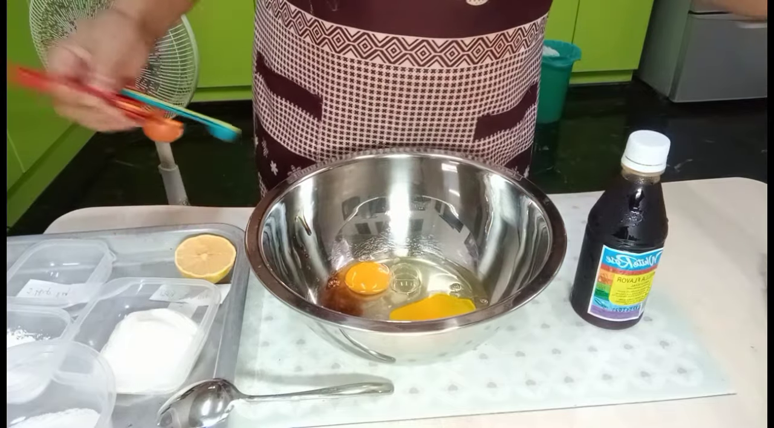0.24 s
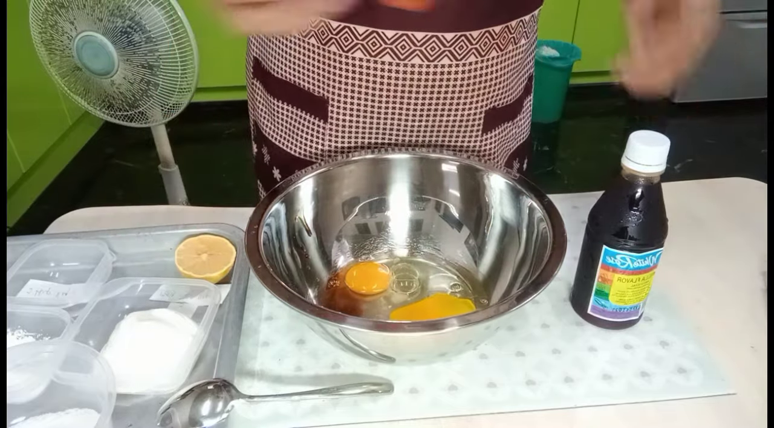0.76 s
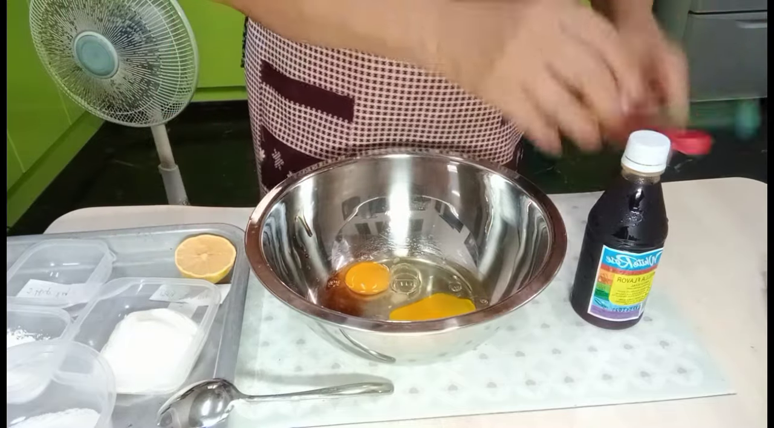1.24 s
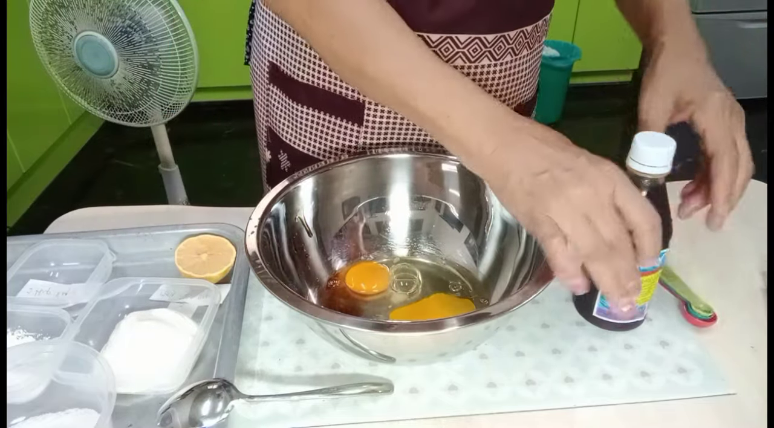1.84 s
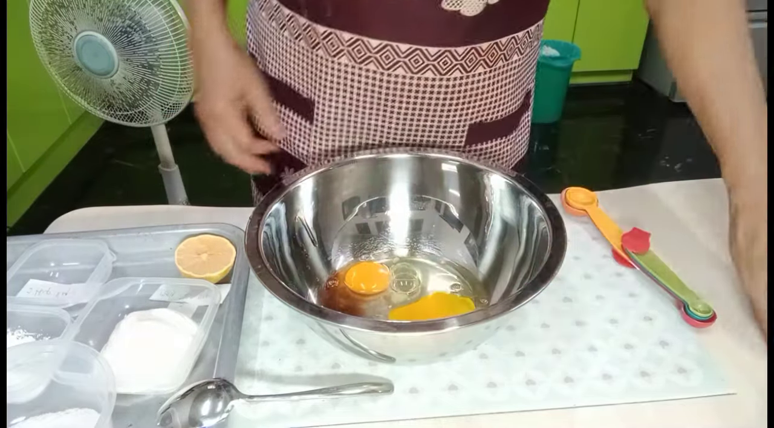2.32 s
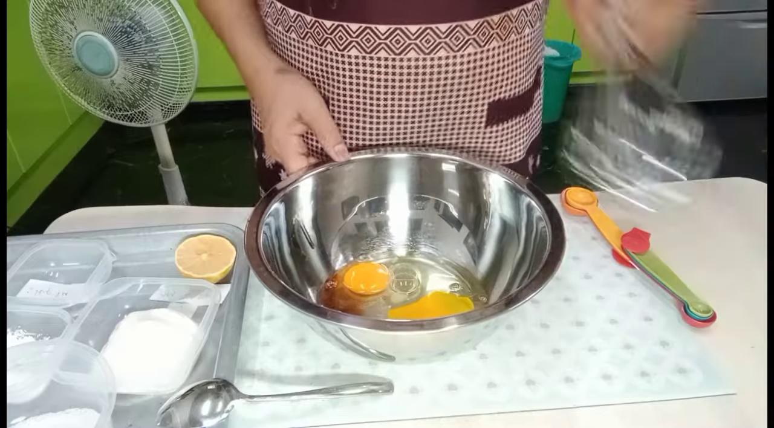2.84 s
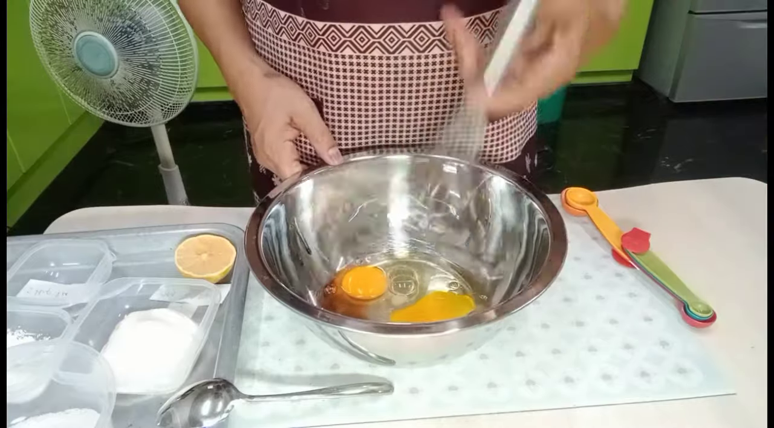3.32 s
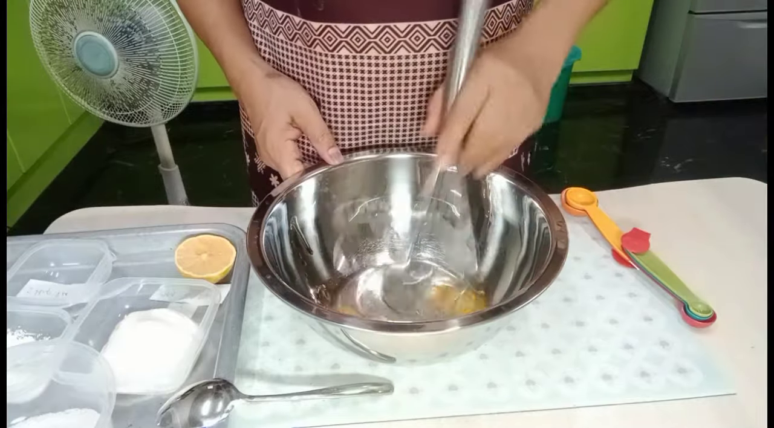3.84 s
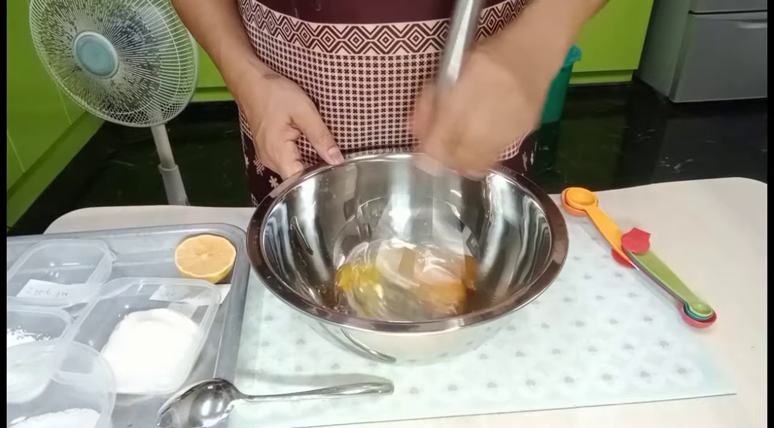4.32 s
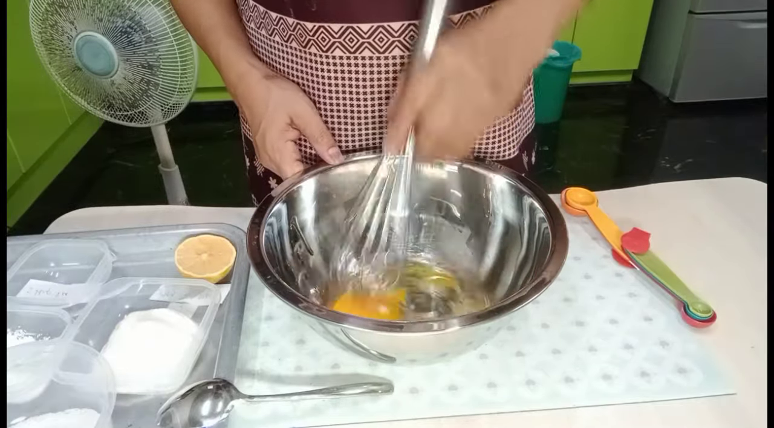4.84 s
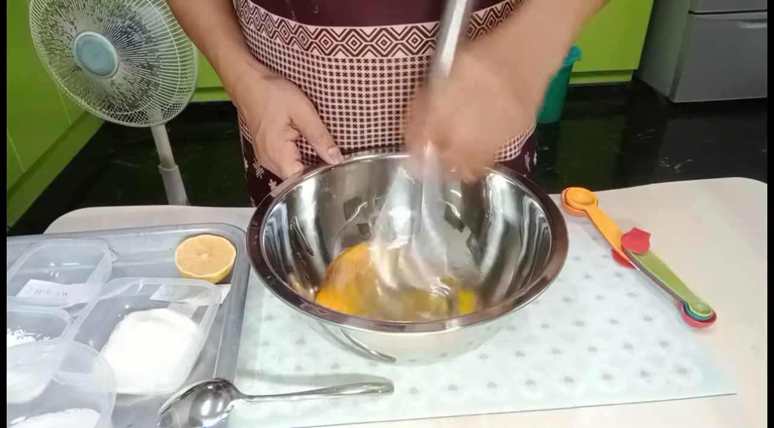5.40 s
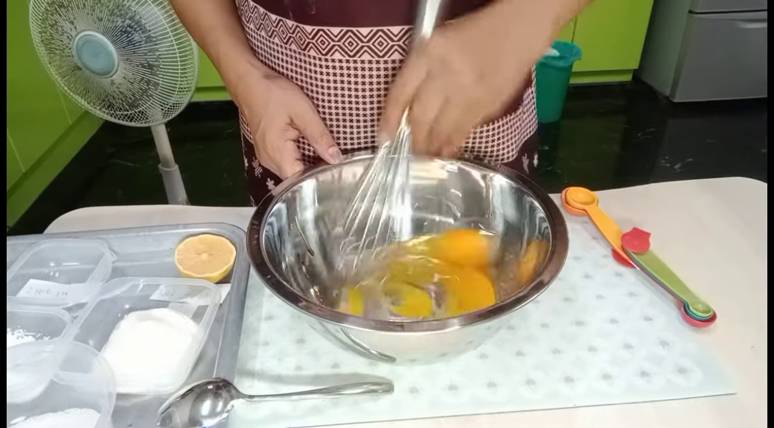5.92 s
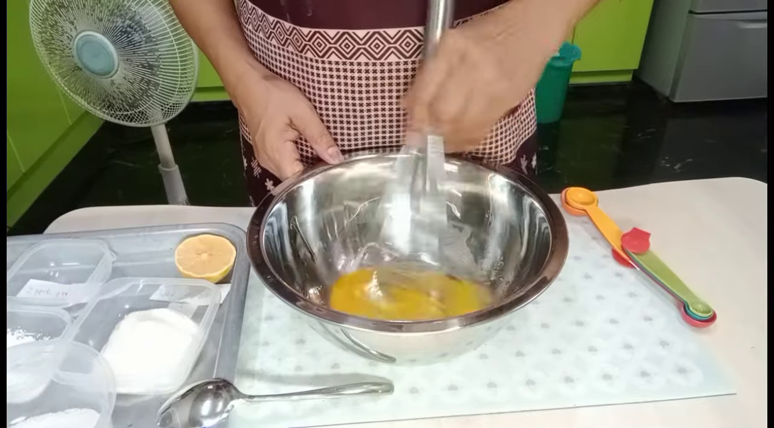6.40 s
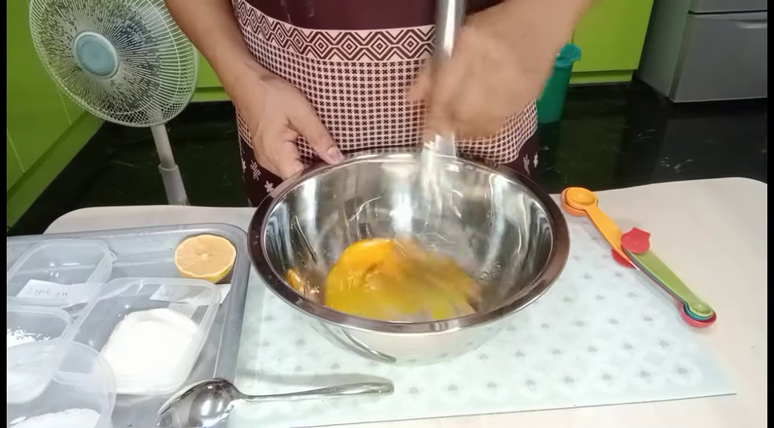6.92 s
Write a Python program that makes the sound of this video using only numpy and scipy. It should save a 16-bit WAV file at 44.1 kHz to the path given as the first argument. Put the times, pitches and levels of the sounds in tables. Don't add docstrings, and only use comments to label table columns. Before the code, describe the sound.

After light plastic clacks and a dull thud, a whisk strikes a steel bowl brightly, then clinks, scrapes and sloshes through egg in a hard kitchen.

```python
import sys
import numpy as np
from scipy import signal
from scipy.fft import rfft, irfft, next_fast_len
from scipy.io import wavfile
from scipy.ndimage import uniform_filter1d, map_coordinates

SR = 44100
rng = np.random.default_rng(int(sys.argv[2]) if len(sys.argv) > 2 else 0)


def boost_factor(decibels):
    exponent = np.asarray(decibels, float) / 20
    return 10 ** exponent


def transcribe(signal):
    frames = np.atleast_2d(signal).T
    limited = np.clip(frames, -1, 1)
    pcm = np.round(limited * 32767).astype(np.int16)
    wavfile.write(sys.argv[1], SR, pcm)


N = 315756
TAIL = 3 << 13
ROOMY = 1 << 15
BEFORE = 4096
LONG = next_fast_len(N + TAIL)

# start in seconds, peak level in dB, then thud, body and edge
# in dB against the peak.
RIM = [
    (3.2245, -8.5, -21.5, -12, -9),
    (3.2784, -19, -42, -11, -15.5),
    (3.357, -21, -14, 0, -3),
]
# start in seconds, peak level in dB, then thud, body and edge
# in dB against the peak.
CLINKS = [(3.546, -16, -21, -9.5, -15), (3.898, -30.5, -29, -33, -11), (3.934, -28, -32, -13, -13),
          (5.117, -30.5, -13, -2, -0.5), (5.3118, -30.5, -19, -7, 0), (5.3455, -20, -7.5, -8.5, -5),
          (5.564, -31, -15, -5, -1), (5.6565, -34.5, -32, -9, -12), (5.8007, -12.5, -15.5, -14, -14.5),
          (5.9295, -25, -6, -7, 1.5), (6.7175, -12.5, -15, -15, -7.5), (6.852, -38, -39, -31, 11),
          (6.987, -47, -34, 7, 10)]
# start in seconds, peak level in dB, then body and edge
# in dB against the peak.
SWIPES = [(3.565, -1.5, -11.5, -19), (3.597, -42, -7, -39), (3.7456, -20.5, -0.5, -9.5),
          (4.0273, -27.5, -9, 0), (4.1627, -33, 1.5, -7), (4.2065, -25.5, -30, -19), (4.3452, -36, -4, -2),
          (4.4605, -28.5, -14, -11), (4.482, -26.5, -0.5, -4.5), (4.543, -31.5, -5, 1),
          (4.6831, -37, 9, -13), (4.7407, -29.5, 4, -26), (4.9, -35.5, -43, 11), (5.0139, -31, -6, 2),
          (5.262, -35, -5, 7), (5.4344, -44, -13, -28), (5.792, -7.5, -15, -6.5), (6.19, -26.5, 11, -8),
          (6.4109, -24.5, -6, -9), (6.47, -30.5, 8, 3), (6.665, -24, -13, 0), (6.755, -12.5, -8, -11),
          (6.9015, -25, 3, 2), (7.0244, -47, -10, 9)]
BOWL_HZ = [265, 345, 615, 788, 899, 1067, 1125, 1270, 1357, 1513, 1873, 2120, 2640, 3400, 3550, 3760, 3900,
           5782, 5932, 6541, 6713, 6891, 7063, 7214, 7542, 9044, 9604, 9970]
# level in dB, T60 in seconds.
BOWL = [(-3.5, 0.1), (11, 0.14), (12, 0.075), (11, 0.11), (-2.5, 0.66), (-26, 0.48), (3.5, 0.28),
        (16, 0.085), (-17, 0.15), (4.5, 0.12), (-3, 0.6), (5, 0.21), (-21, 0.32), (2, 0.049), (9, 0.07),
        (1, 0.07), (12, 0.027), (-7, 0.027), (11, 0.12), (7, 0.2), (9, 0.2), (11, 0.2), (9, 0.2), (5, 0.2),
        (-24, 1), (-4, 0.53), (-27, 0.27), (-16, 0.21)]


def unit(x):
    return x / np.sqrt(np.mean(x ** 2, axis=-1, keepdims=True) + 1e-20)


def along(points, hz):
    f, v = np.transpose(points)
    return np.interp(np.log(hz + 1), np.log(f + 1), v)


def curves(rows):
    s, *cols = np.transpose(rows)
    return [np.interp(np.arange(N) / SR, s, c) for c in cols]


def wobble(rate):
    knots = rng.standard_normal(int(N * rate / SR) + 4)
    return map_coordinates(knots, [np.arange(N) * rate / SR])


def causal(db):
    cepstrum = irfft(np.log(boost_factor(db) + 1e-6))
    half = cepstrum.shape[-1] // 2
    cepstrum[..., 1:half] *= 2
    cepstrum[..., half + 1:] = 0
    return np.exp(rfft(cepstrum))


def noise(spectrum, spiky_db=0):
    strength_db = spiky_db * np.minimum(rng.exponential(size=LONG), 5)
    hail = rng.standard_normal(LONG) * boost_factor(strength_db)
    gain = boost_factor(along(spectrum, np.fft.rfftfreq(LONG, 1 / SR)))
    return irfft(rfft(unit(hail)) * gain)[:N]


def patchy(x, depth_db):
    z = signal.stft(x, nperseg=512)[2]
    field = uniform_filter1d(rng.standard_normal(z.shape), size=4, axis=0)
    field = uniform_filter1d(field, size=7, axis=1)
    return signal.istft(z * boost_factor(depth_db * field / field.std()), nperseg=512)[1][:N]


def tails(count):
    # frequency in Hz, T60 in seconds.
    decay = [(150, 0.32), (700, 0.54), (2000, 0.59), (7000, 0.6), (14000, 0.32)]
    hz, t, z = signal.stft(rng.standard_normal((count, TAIL)), SR, nperseg=256)
    fall = boost_factor(-60 * t / np.abs(along(decay, hz))[:, None])
    tail = signal.istft(z * fall, SR, nperseg=256)[1][:, :TAIL]
    tail *= np.clip(np.arange(TAIL) / SR / 0.0024, 0, 1) ** 2
    return unit(tail) / np.sqrt(TAIL)


def placed(times, sounds, wet_db):
    answers = rfft(tails(count=12), ROOMY)
    answers = answers[np.arange(len(times)) % len(answers)]
    heard = irfft(rfft(sounds, ROOMY) * (1 + boost_factor(wet_db) * answers))
    out = np.zeros(BEFORE + N + ROOMY)
    for s, sound in zip(times, heard):
        out[BEFORE + round(s * SR):][:ROOMY] += sound
    return out[BEFORE:][:N]


def rings(count, scatter_db, hz=BOWL_HZ, levels=BOWL, blur=.12):
    db, t60 = np.transpose(levels)[:, :, None]
    hz = np.c_[hz]
    t = np.arange(TAIL) / SR
    wander = np.cumsum(rng.standard_normal((len(hz), TAIL)), axis=1)
    phase = 2 * np.pi * hz * t + blur * (hz / 7000) ** 2 * wander
    modes = boost_factor(db - 60 * t / np.abs(t60)) * np.sin(phase)
    spots = boost_factor(scatter_db * rng.standard_normal((count, len(hz))))
    return unit(spots @ modes) / np.sqrt(TAIL)


def chatter(count, shape, grain_db):
    z = rfft(rng.standard_normal((count, TAIL)) * shape)
    contacts = boost_factor(grain_db * rng.standard_normal((count, TAIL // 64)))
    even = irfft(z / np.sqrt(np.abs(z) + 1e-9)) * np.sqrt(shape) * np.repeat(contacts, 64, axis=1)
    return unit(even) * np.sqrt(np.mean(shape ** 2))


def struck(rows, material, rise, t60, lumpy_db, ring=None, grain_db=0):
    # frequency in Hz,
    # lift in dB per Hz above the event's own level.
    bands = [(90, 19.5), (300, 23), (1150, 11), (3300, 8.5), (7500, 7), (14000, 24)]
    t, hz = np.arange(TAIL) / SR, np.fft.rfftfreq(TAIL, 1 / SR)
    onset = (1 - np.exp(-t / rise)) ** 2
    shape = boost_factor(-60 * t / t60) * onset
    knots, lift = np.transpose(bands)
    colour = np.array([db + along(np.c_[knots, lift + [thud, thud, body, edge, 0, air]], hz)
                       for s, db, thud, body, edge, air in rows])
    lumps = uniform_filter1d(rng.standard_normal(colour.shape), size=120)
    lumps = unit(uniform_filter1d(lumps, size=120))
    lumps *= lumpy_db / (1 + (hz / 5000) ** 2)
    filtered = causal(colour + along(material, hz) + lumps)
    sound = rfft(chatter(len(rows), shape, grain_db)) * filtered
    if ring is not None:
        sound += rfft(ring * onset) * causal(colour)
    return irfft(sound)


def pockets(db, hz, t60, size):
    t = np.arange(size) / SR
    bend = 0.061 * rng.standard_normal(hz.shape)
    envelope = boost_factor(db - 60 * t / t60) * (1 - np.exp(-t / 0.0014)) ** 2
    return envelope * np.sin(2 * np.pi * hz * (t + bend * t * t / t60))


def fan():
    # time in seconds, level in dB.
    rotor = [(0, -45), (.55, -43), (.85, -53), (1.5, -42.5), (1.9, -56), (2.6, -57.5), (3.1, -51),
             (3.9, -46), (4.7, -58), (6.0, -59), (6.45, -49.5), (7.16, -72)]
    throbs = [-1, -6.5, 6.5, 1.5, -3, 1, 0.5, 1.5, 0, 1, -2, -1.5, -11, -3.5, -4, -2, 0, 3.5, -3, -2, 2.5,
              2.5, -0.5]
    # frequency in Hz, level in dB per Hz.
    air = [(25, 16), (60, 0.5), (95, 6), (118, 17), (140, 7.5), (180, 12.5), (212, -1.5), (232, 11),
           (252, -3), (298, -2), (320, 11), (345, 0), (430, -4), (560, 1.5), (620, 4), (700, -2.5),
           (1150, -3), (1260, 6), (1400, -6), (2700, -5), (16000, -10)]
    mains_hz, beat_hz, in_step_s, first_throb_s = 120.07, 3.2, .8, .175
    mains_db, side_db, swell_db = -55, -73, 5.5
    t = np.arange(N) / SR
    turn = 2 * np.pi * (t - in_step_s)

    def line(order):
        level = boost_factor(2 * wobble(10.0))
        return level * np.sin((mains_hz - order * beat_hz) * turn + .45 * wobble(2.0))

    hum = boost_factor(mains_db) * line(0) + boost_factor(curves(rotor)[0]) * line(1) + boost_factor(side_db) * line(2)
    gusts_db = -56.5 + 12.0 + .5 * wobble(1.5) + 0.18 * wobble(16)
    breeze = boost_factor(gusts_db) * patchy(noise(air), depth_db=1.6)
    throb_db = np.interp(t, first_throb_s + np.arange(len(throbs)) / beat_hz, throbs)
    swell = boost_factor(throb_db + 7.5 + swell_db * (np.cos(beat_hz * turn) - 2.1))
    return swell * hum + breeze


def spoons():
    # start in seconds, peak level in dB, then body, edge and air
    # in dB against the peak.
    clicks = [(-0.015, -34.5, 3, -9.5, -50), (0.017, -54, 6, 9, -38), (0.922, -27.5, -37, -19.5, -43),
              (0.951, -35, -20, -8.5, -8.5), (0.9798, -51, 0, -6, -26), (1.01, -53, -30, 9, -22),
              (1.08, -57.5, 11, -11, -29), (1.392, -18.5, -3.5, -11, -22.5), (1.4232, -58, -4, 4.5, -27),
              (1.4598, -42.5, -20, 11.5, -30), (1.508, -26, -7, -10, -15), (1.5921, -17, -9, -10.5, -13),
              (1.6, -18, -17, -15.5, -21), (2.479, -47.5, -12, -12, -45)]
    # start in seconds, peak level in dB, then thud, body and edge
    # in dB against the peak.
    bottle_rows = [
        (2.1135, -49.5, 8.5, 7.5, 12),
    ]
    # frequency in Hz, level in dB.
    plastic = [(800, -0.5), (1200, -4), (1800, 0.5), (3800, 4), (4700, 7.5), (5600, 3.5), (7000, -3),
               (9000, 2.5)]
    # frequency in Hz, level in dB.
    table_top = [(50, 0), (125, 6), (250, 4), (400, -10.5), (600, 9), (1000, 5), (2000, -10.5), (3500, -5)]
    thud_db, thud_grows, bottle_air_db = -51.5, 0.33, -28
    rows = [(s, db, thud_db + thud_grows * db - db, body, edge, air) for s, db, body, edge, air in clicks]
    rattle = boost_factor(11) * struck(rows, plastic, rise=.0006, t60=.016, lumpy_db=.6)
    bottle = boost_factor(5.5) * struck([(*bottle_rows[0], bottle_air_db)], table_top,
                               rise=0.00059, t60=0.056, lumpy_db=0.0)
    return placed([row[0] for row in clicks + bottle_rows], np.r_[rattle, bottle], wet_db=4.0)


def plops():
    # start in seconds, peak level in dB, pitch in Hz, T60 in seconds.
    bursts = [(3.356, -19, 1144, 0.063), (3.732, -39, 1273, 0.051), (3.768, -34.5, 1280, 0.019),
              (3.861, -24, 1556, 0.023), (3.955, -35.5, 1310, 0.034), (4.248, -40, 1495, 0.044),
              (4.329, -44.5, 830, 0.1), (4.839, -23.5, 1174, 0.02), (6.214, -28.5, 858, 0.071),
              (6.686, -34.5, 588, 0.045), (6.77, -30.5, 1278, 0.083)]
    pings = [(3.2311, -9.5, 3954, 0.024), (3.3614, -29, 3644, 0.039), (3.5844, -29.5, 3920, 0.032),
             (4.0544, -50, 3500, 0.041), (4.4857, -41.5, 3620, 0.024), (5.0294, -49, 3560, 0.046),
             (5.3453, -40, 3180, 0.011), (5.8067, -32, 3830, 0.033), (6.2003, -30.5, 3520, 0.017),
             (6.4894, -41.5, 3480, 0.03), (6.7201, -14.5, 3410, 0.017)]
    knocks = [(0.091, -57, 880, 0.51), (3.749, -39.5, 617, 0.2), (3.954, -44, 630, 0.06),
              (4.019, -47, 506, 0.081), (5.125, -27.5, 616, 0.026), (5.316, -33, 571, 0.045),
              (5.566, -34, 584, 0.068), (5.678, -42, 893, 0.064), (5.932, -40.5, 834, 0.21),
              (6.419, -39.5, 595, 0.056), (6.986, -49, 595, 0.16)]
    thuds = [(1.399, -45, 261, 0.15), (2.114, -43, 99.6, 0.061), (2.12, -30.5, 111, 0.12),
             (3.359, -27.5, 106, 0.079), (3.577, -36, 279.5, 0.16), (5.123, -43, 148, 0.068),
             (5.345, -28, 191.3, 0.11), (6.29, -42.5, 342, 0.062), (6.718, -24, 226, 0.066),
             (6.722, -29.5, 336, 0.11), (7.052, -42.5, 193, 0.14)]
    clacks = [
        (.923, -23, 5230, 0.013),
        (0.925, -39, 3240, .02),
        (.924, -40, 8700, .012),
        (.952, -46, 3370, 0.018),
        (.952, -42, 9500, .012),
        (1.392, -12, 7260, 0.021),
        (1.393, -23.5, 1260, 0.014),
        (1.462, -40, 3300, .02),
        (1.6, -32, 9250, .02),
    ]
    s, db, hz, t60 = np.transpose(bursts + pings + knocks + thuds + clacks)[:, :, None]
    return placed(s[:, 0], pockets(db + 9.5, hz, t60, size=TAIL // 2), wet_db=-7)


def froth(count=1500, size=1792):
    draw = rng.random((count, 1))
    hz = np.clip(1300 * np.exp(.65 * rng.standard_normal((count, 1))), 400, 4200)
    size_db = np.minimum(3.5 * rng.exponential(size=(count, 1)), 6)
    grains = pockets(size_db, hz, 0.058 + 25 / hz, size=size)
    where = (draw * N).astype(int) + np.arange(size)
    return unit(np.bincount(where.ravel(), grains.ravel(), N + size)[:N])


def wake():
    grows, rise_s, t60_s = 0.96, 0.024, 0.65
    s, db = np.transpose([row[:2] for row in RIM + CLINKS + SWIPES])[:, :, None]
    since = np.maximum(np.arange(0, N, 64) / SR - s, 0)
    shake = boost_factor(grows * db - 60 * since / t60_s) * (1 - np.exp(-since / rise_s))
    return np.repeat(shake.sum(axis=0), 64)[:N]


def stirring():
    # time in seconds, effort in dB.
    drag_effort = [(3.3, -31), (3.6, -58), (3.87, -48), (4.01, -47), (4.3, -45.5), (4.89, -48.5),
                   (5.3, -45), (5.42, -44), (5.6, -44.5), (5.85, -44), (6.21, -45.5), (6.52, -43),
                   (6.7, -45), (6.9, -52), (7.0, -45), (7.05, -52), (7.16, -53)]
    starts_s = 3.5
    hiss_db, slosh_db = -12, -19
    hiss_wake_db, slosh_wake_db = -27.5, -38
    effort = boost_factor(curves(drag_effort)[0]) * (np.arange(N) / SR > starts_s)
    shake = wake()

    hiss = (boost_factor(hiss_db) * effort + boost_factor(hiss_wake_db) * shake) * boost_factor(9.0 + 3.5 * wobble(15))
    hiss *= noise([(1800, -38), (2600, -16.5), (4000, -6.0), (5800, -4.5), (7000, 0.5), (8200, -7.5),
                   (10000, -7.5), (15000, -8)], spiky_db=6.0)
    scrape = effort * boost_factor(2 + 4.5 * wobble(22))
    scrape *= noise([(600, -15), (850, -10.5), (1700, -5.0), (2400, -8.5), (4000, -85)], spiky_db=1.0)
    slosh = (boost_factor(slosh_db) * effort + boost_factor(slosh_wake_db) * shake) * boost_factor(13.5 + 3.5 * wobble(25))
    slosh *= noise([(50, -50), (110, -15), (200, 1.0), (350, 5.0), (600, -4.5), (900, -39), (1500, -43)])

    steel = signal.fftconvolve(hiss + scrape, rings(1, scatter_db=4)[0])[:N]
    near = hiss + scrape + slosh + boost_factor(-3.0) * steel + boost_factor(-6.5) * effort * froth()
    return near + boost_factor(-9.0) * signal.fftconvolve(near, tails(1)[0])[:N]


def singing():
    # start in seconds, peak level in dB, pitch in Hz, T60 in seconds. Modes left
    sings = [(3.226, -24, 1510, 0.45), (3.226, -26.5, 899, 0.77), (3.226, -32, 1858, .6),
             (3.227, -27, 2643, 0.39), (3.226, -28, 594, 0.17), (3.226, -36, 788, 0.6),
             (3.265, -31.5, 1356, 0.68), (3.357, -25, 621, 0.26), (3.357, -26.5, 786, 0.27),
             (3.357, -23, 882, .2), (3.357, -28, 1112, .6), (3.357, -28, 1508, 0.41),
             (3.357, -30.5, 2106, .4), (3.357, -23, 2610, 0.096), (3.357, -32, 3200, 0.27),
             (3.357, -32, 3700, 0.27), (3.55, -30.5, 349.4, 0.32), (3.549, -28.5, 918, 0.24),
             (3.572, -23.5, 1236, 0.23), (3.572, -21.5, 1648, 0.067), (3.572, -31, 592, .08),
             (3.587, -30, 2530, 0.12), (4.845, -43, 1150, .4), (5.135, -40, 1280, .15),
             (5.14, -41, 714, .3), (5.347, -32, 820, 0.22), (5.347, -35, 1253, .15), (5.375, -39, 2950, .2),
             (5.566, -41, 2290, .12), (5.57, -40, 1288, 0.18), (5.799, -31, 1217, 0.092),
             (5.81, -35.5, 2290, 0.42), (5.802, -35, 3811, .16), (5.81, -47, 600, 0.26),
             (5.84, -32, 826, 0.25), (5.85, -36, 1307, 0.17), (5.932, -40, 300, .15),
             (5.932, -37, 612, 0.14), (6.21, -34, 1240, 0.1), (6.72, -30, 1490, 0.41),
             (6.72, -26, 795, 0.13), (6.72, -35, 2990, 0.23), (6.772, -25, 830, 0.11),
             (6.99, -40.5, 1258, 0.37), (7.0, -42, 490, 0.51),
             (3.216, -40, 6800, .05), (3.226, -8, 5782, .07), (3.228, -13, 5932, .2),
              (3.226, -14, 6891, .2), (3.228, -12, 6713, .08), (3.575, -22, 6600, .08),
              (2.114, -48, 3500, .2), (2.1135, -30, 5300, .004), (6.72, -22, 6890, .25),
              (6.9029, -30, 10200, .02), (6.9508, -36, 9800, .02), (3.72, -40, 1240, .5),
              (3.358, -15, 1190, .1), (.925, -44, 7400, .2), (.025, -45, 1300, .2), (0, -46, 7000, .3)]
    snap = [
        (3.2778, 6, 6900, .003),
    ]
    # start in seconds, peak level in dB, pitch in Hz,
    # T60 in seconds, glide in Hz per second.
    glides = [
        (3.955, -44, 1420, 0.18, 7000),
        (4.082, -28, 1700, .06, 5000),
        (4.103, -33, 1694, 0.18, -9000),
        (4.149, -39, 1170, .08, 2000),
        (4.215, -44, 1520, .15, 500),
        (4.265, -42, 1180, 0.11, 3000),
        (4.34, -41, 1140, .12, -2000),
        (4.88, -45, 1074, .08, 2000),
        (4.93, -42, 1230, 0.11, -1000),
        (3.41, -26, 1243, 0.18, -2500),
    ]
    steel_rise_s, glide_rise_s = 0.00036, 0.0031
    t = np.arange(TAIL) / SR
    rows = [(*row, 0, steel_rise_s) for row in sings + snap]
    rows += [(*row, glide_rise_s) for row in glides]
    s, db, hz, t60, glide, rise = np.transpose(rows)[:, :, None]
    bent = glide * t60 / 4 * (t - t60 / 4 * (1 - np.exp(-4 * t / t60)))
    envelope = boost_factor(db - 60 * t / t60) * (1 - np.exp(-t / rise)) ** 2
    tones = envelope * np.sin(2 * np.pi * (hz * t + bent))
    return placed(s[:, 0], tones, wet_db=-10)


def clinks():
    free_hz = [616, 899, 1067, 1125, 1230, 1357, 1513, 1873, 2120, 2643, 3290, 3760, 3900, 5782, 5932, 6545,
               6713, 6890, 7219, 7540, 8436, 9044, 9606, 9970]
    # level in dB, T60 in seconds.
    free_levels = [(-8, 0.4), (-18, .5), (-16, 0.3), (-18, .3), (-15, .3), (-3, 0.53), (-19, 0.35),
                   (-3, 0.46), (-27, 0.28), (-16, 0.23), (-13, 0.25), (-3, 0.17), (-7, 0.17), (9.5, 0.099),
                   (2, .25), (5.5, 0.34), (5, 0.54), (-17, 0.52), (-5, 0.28), (-8, 0.79), (4, 0.6),
                   (0, 0.55), (-3, 0.32), (4, 0.22)]
    rim_ring_db = [2.5, -20, -4]
    # frequency in Hz, level in dB.
    slap = [(60, -28), (150, -0.5), (500, -8), (2800, -9.5), (3800, -11.5), (5200, -2.5), (6300, 0.5),
            (7000, 1.5), (8000, -5.5), (10000, -2.5)]
    # start in seconds, peak level in dB,
    # edge in dB against the peak.
    tick_rows = [(3.278, -12, 2), (4.362, -39, -3), (4.4383, -38, -8), (4.6256, -41, -8), (4.6994, -36, -8),
                 (4.7474, -43, -13), (4.8309, -31, -7), (4.9037, -31, -12), (5.022, -34, -6),
                 (5.049, -25.5, -6), (5.0814, -39, -10), (5.2435, -54, -12), (5.3755, -16.5, -2),
                 (5.8048, -15, -3), (6.1465, -29, -11), (6.1906, -26.5, 1), (6.38, -40, -8),
                 (6.3939, -34, -8), (6.421, -34, -3), (6.4342, -21.5, -12), (6.656, -31, -10),
                 (6.6717, -35, -10), (6.7838, -8, -20), (7.004, -25, -8)]
    rim_air_db, clink_air_db, swipe_air_db, swipe_thud_db = -16.5, -18, -15.5, -25.5
    tick_thud_db, tick_body_db, tick_air_db = -33.5, -35, -32
    swipe_lead_s = .006

    free = rings(len(RIM), scatter_db=1.0, hz=free_hz, levels=free_levels, blur=.06)
    free *= boost_factor(13.5 + np.c_[rim_ring_db])
    rim = boost_factor(5.5) * struck([(*row, rim_air_db) for row in RIM], slap,
                            rise=0.0012, t60=0.095, lumpy_db=3, ring=free)

    egg = boost_factor(-60 * np.arange(TAIL) / SR / .35)
    dull = boost_factor(10.0) * egg * rings(len(CLINKS), scatter_db=4)
    square = boost_factor(7.0) * struck([(*row, clink_air_db) for row in CLINKS], slap,
                               rise=0.00099, t60=0.041, lumpy_db=4.5, grain_db=2.5, ring=dull)

    swipes = [(s, db, swipe_thud_db, body, edge, swipe_air_db) for s, db, body, edge in SWIPES]
    brushed = boost_factor(8.0) * egg * rings(len(SWIPES), scatter_db=-0.5)
    glancing = boost_factor(11.5) * struck(swipes, slap, rise=0.025, t60=0.086, lumpy_db=0.5, grain_db=3.5, ring=brushed)

    rows = [(s, db, tick_thud_db, tick_body_db, edge, tick_air_db) for s, db, edge in tick_rows]
    ticks = boost_factor(2.5) * struck(rows, slap, rise=0.00058, t60=0.01, lumpy_db=13.0)

    times = [row[0] for row in RIM + CLINKS] + [row[0] - swipe_lead_s for row in SWIPES]
    wet_db = [1.5] * len(times) + [-5] * len(ticks)
    times += [row[0] for row in tick_rows]
    return placed(times, np.r_[rim, square, glancing, ticks], wet_db=np.c_[wet_db])


def scene():
    whisk = patchy(clinks(), depth_db=1.8) + patchy(stirring(), depth_db=3)
    return (fan() + spoons() + plops() + singing() + whisk)[None]


def band_limit(x):
    return signal.sosfilt(signal.butter(12, 16850, fs=SR, output="sos"), x)


def record(dry):
    # frequency in Hz, level in dB.
    resonances = [(900, -1.5), (1250, 2), (1750, -2), (3700, 2), (4600, -17.5), (5750, -4.5), (6250, -12.5),
                  (6950, 0), (8150, -11.5), (9400, -5), (11000, -16.5), (12500, -26), (15000, -14.5),
                  (15600, -15)]
    shelf_hz, top_hz = 15620, 16850
    hz = np.fft.rfftfreq(LONG, 1 / SR)
    bass_cut_db = 10 * np.log10(1 + (85 / (hz + 1)) ** 5)
    heard = irfft(rfft(dry, LONG) * causal(along(resonances, hz) - bass_cut_db), LONG)
    heard = heard / (1 + np.abs(heard) ** 6) ** (1 / 6)
    shelf = boost_factor(-21 * (1 + np.tanh((hz - shelf_hz) / 25)))
    heard = irfft(rfft(heard) * shelf * (hz < top_hz), LONG)[:, :N]
    return band_limit(heard)


dry = scene()
out = record(dry)
transcribe(out)
```